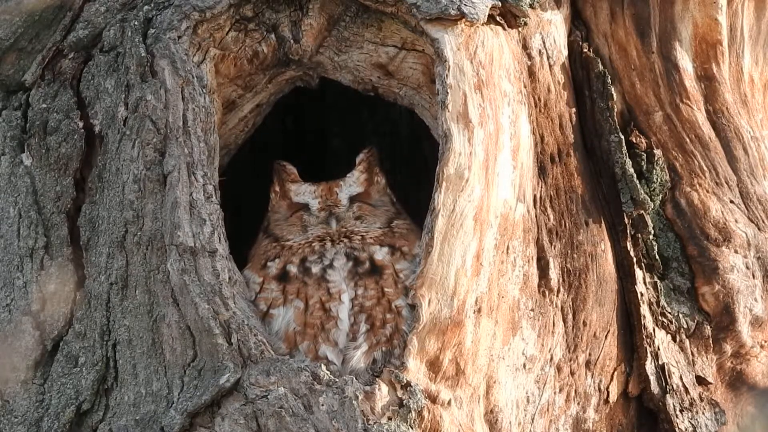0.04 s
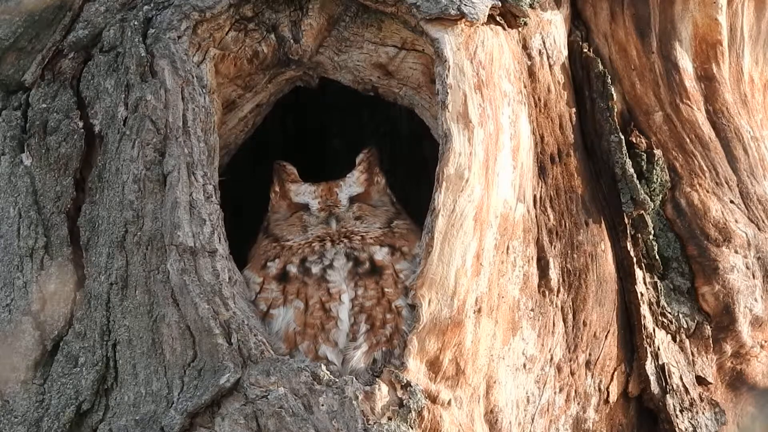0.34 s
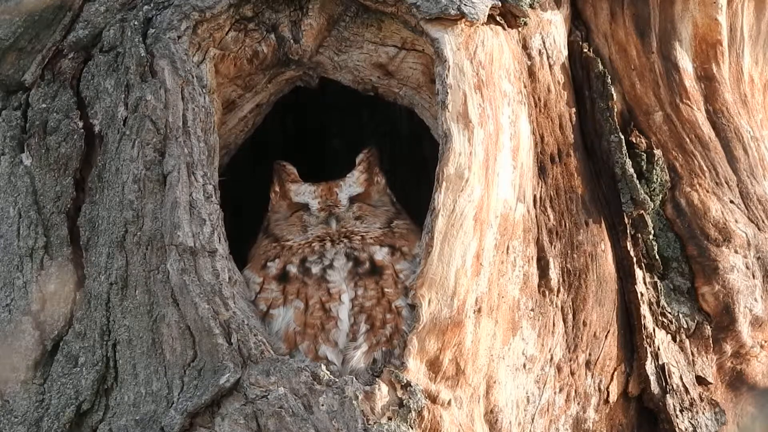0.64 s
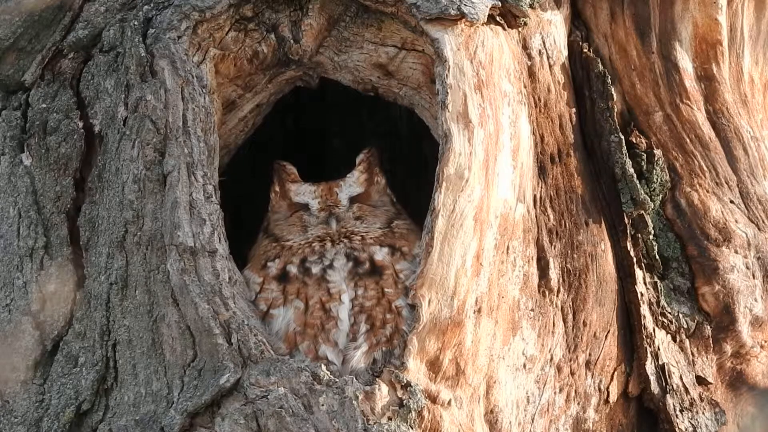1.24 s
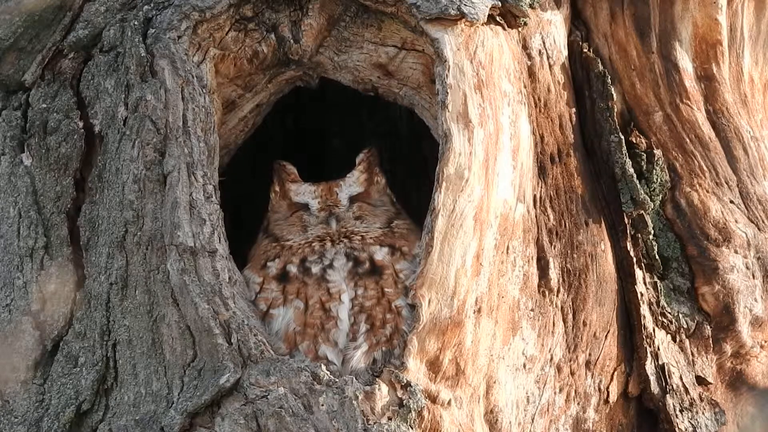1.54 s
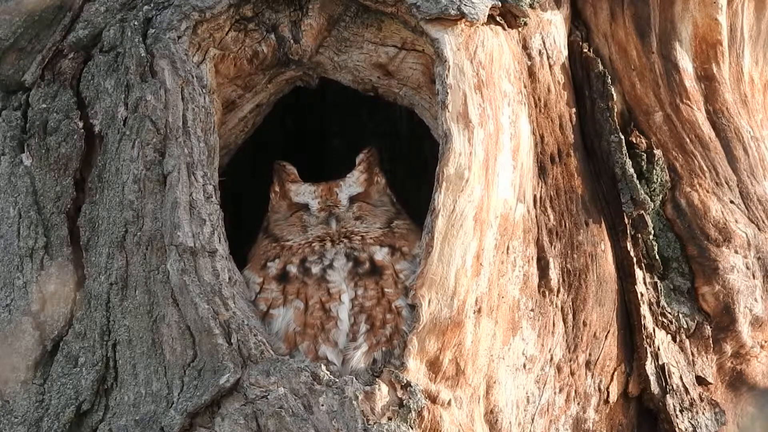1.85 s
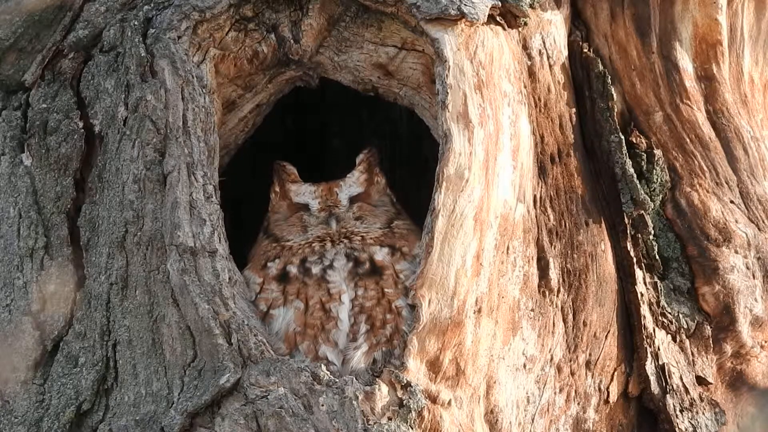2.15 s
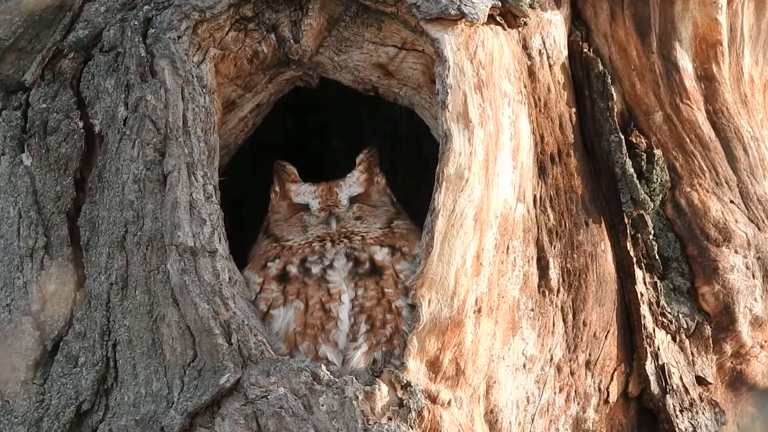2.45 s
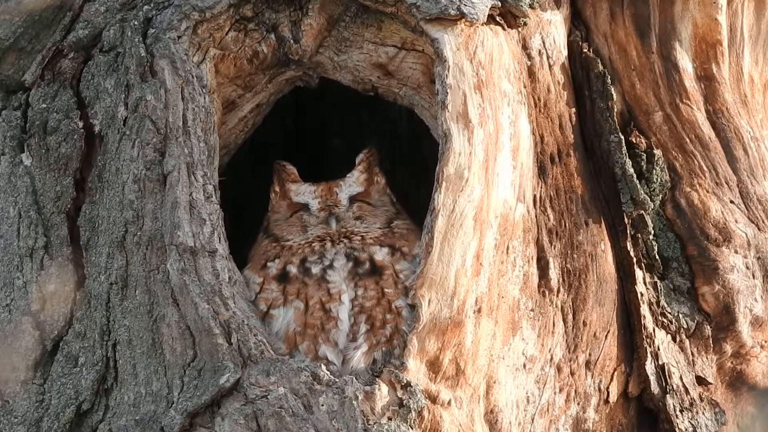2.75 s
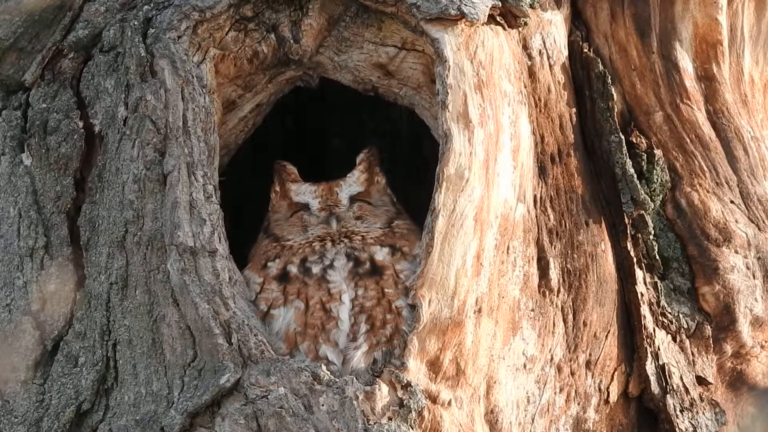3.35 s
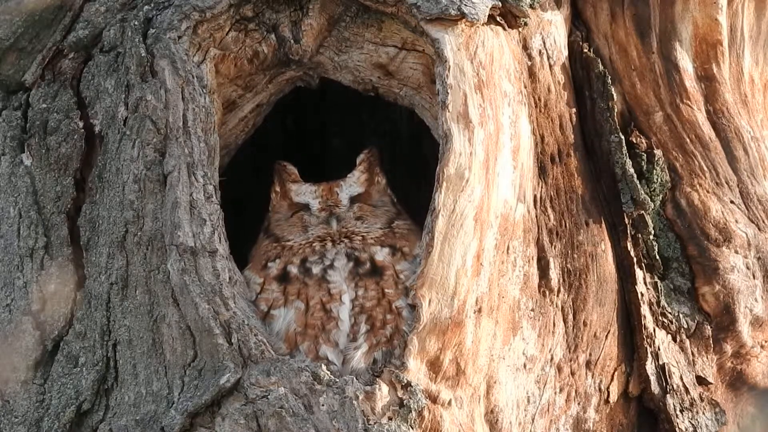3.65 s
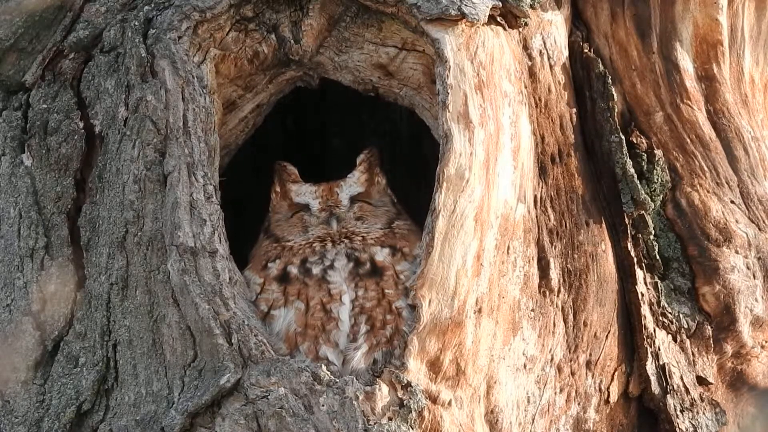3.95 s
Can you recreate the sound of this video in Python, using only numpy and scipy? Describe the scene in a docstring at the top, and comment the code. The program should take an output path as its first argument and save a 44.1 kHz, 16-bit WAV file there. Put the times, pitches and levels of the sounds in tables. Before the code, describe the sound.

Jays scold close to the microphone in a faintly echoing wood. One raspy falling cry is followed by soft hisses, nasal notes and pips from far birds, then a run of overlapping squawks, all over distant traffic and engine drone.

```python
"""A small far bird hisses in short swells and another gives nasal yanks, over distant traffic rumble,
a low engine drone and faint air. Almost at once two near jays scold, their harsh falling cries
overlapping: each starts clear, splits into subharmonics by period doubling and breaks into a rasp.
A third small bird answers the yanks with thin pips. Trunks scatter the calls and the wood reverberates
faintly; the sound reaches two microphone ports, whose gain ducks under the cries."""
import sys
import numpy as np
from scipy import signal
from scipy.fft import rfft, irfft, next_fast_len
from scipy.io import wavfile
from scipy.ndimage import uniform_filter1d, minimum_filter1d, map_coordinates

SR = 44100
rng = np.random.default_rng(int(sys.argv[2]) if len(sys.argv) > 2 else 0)


def wav_out(sig):
    """Save sig, one row per channel (or a flat mono array), as 16-bit PCM at SR to the path in sys.argv[1]."""
    wavfile.write(sys.argv[1], SR, np.round(np.clip(np.atleast_2d(sig).T, -1, 1) * 32767).astype(np.int16))


N = 176400

# Noise spectra. Each row: frequency in Hz, relative spectral density in dB.
TRAFFIC_SPECTRUM = [(28, -38), (40, -4), (85, 4), (160, -5.5), (520, -14), (780, -22.5), (1500, -28),
                    (3000, -78)]
AIR_SPECTRUM = [(700, -37), (1400, 2), (2500, 4), (4000, -6), (15000, -25.5)]
HISS_SPECTRUM = [(3000, -22), (4700, -13.5), (5600, -5), (6700, -4.5), (7800, -13), (9500, -28),
                 (15000, -50)]
RASP_SPECTRUM = [(900, -89), (1600, -8.5), (2000, -44), (2500, -5.5), (3300, -0.5), (4200, -5),
                 (5200, -2.5), (6400, 7), (7600, -6), (8700, -13), (10000, -51), (12000, -37), (15500, -56)]
# The engine's course. Each row: time in seconds, frequency in Hz, level in dB.
DRONE_COURSE = [(0, 45.7, -36), (.65, 43.84, -38.5), (1.68, 45.8, -34.5), (1.82, 47.2, -50),
                (1.98, 47.7, -26.5), (2.37, 48.5, -25.5), (2.55, 47, -41), (2.68, 48.7, -28.5),
                (2.99, 50.55, -27), (3.1, 53.26, -23), (3.53, 56, -26), (3.61, 54.7, -37), (4, 49.8, -29)]
# Hissing scolds. Each row: start in seconds, length in seconds, level in dB that the swell heads for.
HISS_SWELLS = [(-.1, 0.23, -41), (0.585, 0.18, -42), (0.801, .17, -42), (1.02, 0.17, -44.5),
               (1.215, 0.164, -44.5), (1.417, 0.15, -43.5)]
# Nasal notes. Each row: start in seconds, level in dB.
YANK_NOTES = [(.025, -36.5), (.585, -37), (.83, -34), (1.03, -33.5), (1.25, -35.5), (1.4, -43), (1.45, -35),
              (1.675, -38), (2.95, -38), (3.09, -37), (3.24, -38), (3.385, -38.5)]
# A yank's harmonics from the third upward. Each entry: relative level in dB.
YANK_PARTIALS_DB = [-12, 0, -11, -21]
# One table per jay cry. Each row: time in seconds, frequency of the strong second partial in Hz, tone
# level in dB, half-pitch and quarter-pitch subharmonics in dB relative to the tone, rasp level in dB.
CRIES = [
    [(.076, 3670, -24, -18, -39, -26), (.125, 3646, -11.5, -18, -44, -31),
     (.22, 3423, -13, -22, -34, -32.5), (.33, 3277, -15, -10, -23, -25.5),
     (.385, 3252, -10.5, -19, -16.5, -29.5), (.418, 3196, -12.5, -12, -13, -45),
     (.44, 3208, -13.5, -5.5, -38, -54), (.492, 3113, -15, -12, -30, -23.5),
     (.515, 3090, -19.5, -1, -19, -18), (.55, 2886, -55, -11, -20, -31.5)],
    [(1.672, 3620, -28, -7, -40, -36), (1.725, 3590, -13.5, -22, -43, -35),
     (1.856, 3373, -13, -18.5, -39, -31), (1.95, 3291, -13, -10, -18, -27.5),
     (2.0, 3255, -14, -0.5, -8, -29.5), (2.05, 3194, -11.5, -4, -37, -39),
     (2.2, 3165, -13.5, -4.5, -38, -47), (2.228, 3145, -20, 2, -30, -19), (2.26, 3010, -54, -15, -18, -49)],
    [(2.1, 3480, -14, -20, -31, -30), (2.135, 3420, -13, -12, -38, -24.5),
     (2.21, 3282, -11.5, -11, -24, -25.5), (2.255, 3203, -12.5, -7.5, -39, -26),
     (2.33, 3230, -13, -6, -23, -20.5), (2.4, 3218, -10, -7, -35, -16.5),
     (2.462, 3116, -36, -3, -21, -19.5)],
    [(2.392, 3617, -16, -36, -38, -42), (2.44, 3638, -8, -41, -42, -20), (2.5, 3607, -7.5, -21, -45, -22),
     (2.58, 3472, -8.5, -19, -44, -26.5), (2.7, 3316, -11.5, -6, -31, -22.5),
     (2.76, 3166, -19.5, 1, -36, -20), (2.82, 3200, -19, -12, -26, -15.5), (2.85, 3120, -39, -9, -22, -41)],
    [(2.686, 3546, -20, -13, -34, -31), (2.745, 3550, -9, -8, -34, -21),
     (2.77, 3402, -9.5, -1.5, -25, -12.5), (2.805, 3380, -13, -1, -24, -17.5),
     (2.824, 3244, -16, 0, -25, -19), (2.85, 3355, -11, -2, -32, -21.5),
     (2.875, 3267, -15.5, -1, -27, -15.5), (2.893, 3148, -13.5, -18, -15, -16),
     (2.94, 3164, -15.5, -9, -17, -15), (2.99, 2924, -45, -15, 0, -28)],
    [(3.551, 3460, -27, -14, -26, -14.5), (3.595, 3542, -12, -15, -17, -28.5),
     (3.696, 3322, -13, -5.5, -18, -31), (3.765, 3186, -13, -6, -14.5, -39),
     (3.805, 3206, -11, -5, -30, -21.5), (3.88, 3125, -16, -9, -25, -23),
     (3.94, 3040, -19, -14, -15, -21.5), (3.975, 2920, -35, 1, -22, -27)],
    [(3.798, 3383, -23, -18, -24, -35), (3.835, 3378, -17.5, -10, -14, -20.5),
     (3.94, 3274, -13.5, -8, -21, -21), (3.97, 3212, -17.5, -1.5, -30, -39), (4.05, 3155, -7, -8, -30, -42)],
]
# Each entry: which jay, 0 or 1, gives that cry.
CALLERS = [0, 0, 1, 0, 1, 0, 1]
# Resonances of a jay's vocal tract. Each row: frequency in Hz, gain in dB.
VOCAL_TRACT = [(1200, -24), (1650, -23), (2400, -11), (3300, -1), (4000, -7), (4350, -17.5), (5000, -7.5),
               (5700, -10), (6600, -4), (7400, -9.5), (8400, -16), (10400, -34), (15000, -57.5)]
# Each entry: one jay's delay at the left port relative to the right, in seconds.
JAY_LAGS_S = [6.5e-6, -0.0000082]
# Each entry: start of a pip in seconds.
PIP_STARTS = [0.914, 1.115, 1.305, 1.48]
# Reverberation of the wood. Each row: frequency in Hz, time to decay by 60 dB in seconds.
WOOD_T60 = [(1000, 0.13), (3300, 1.68), (6500, 1.65), (11000, 0.073)]
# Colouring of the two ports. Each row: frequency in Hz, left minus right level in dB.
PORT_BALANCE = [(200, -1.3), (3300, -1.4), (5000, -3.5), (6400, 1.3), (8000, 0)]


def amp(db):
    """Decibels to amplitude ratio."""
    return 10 ** (np.asarray(db) / 20)


def unit(x):
    """Normalise to rms 1."""
    return x / np.sqrt(np.mean(x ** 2) + 1e-20)


def along(points, hz):
    """Interpolate (Hz, value) points on a logarithmic frequency axis."""
    f, v = np.transpose(points)
    return np.interp(np.log(hz + 1), np.log(f + 1), v)


def curves(rows, t):
    """Interpolate each column after the first at times t."""
    times, *columns = np.transpose(rows)
    return [np.interp(t, times, column) for column in columns]


def span(start, end):
    """Sample indices and times between two moments."""
    i = np.arange(max(0, int(start * SR)), min(N, int(end * SR)))
    return i, i / SR


def ramp(t, length):
    """A raised-cosine step from 0 to 1."""
    return np.sin(np.pi / 2 * np.clip(t / length, 0, 1)) ** 2


def bell(x, centre, width):
    """A Gaussian of height 1."""
    return np.exp(-((x - centre) / width) ** 2 / 2)


def wobble(t, rate):
    """Smooth random modulation with rate knots a second."""
    return map_coordinates(rng.standard_normal(2048), [t * rate], mode="wrap")


def phase_of(hz):
    """Phase in radians is the integral of frequency."""
    return 2 * np.pi * np.cumsum(hz) / SR


def filtered(x, response):
    """Linear filtering multiplies the spectrum by a frequency response."""
    size = next_fast_len(N + SR // 4)
    return irfft(rfft(x, size) * response(np.fft.rfftfreq(size, 1 / SR)), size)[..., :N]


def noise(spectrum):
    """White noise filtered to a spectrum, at rms 1."""
    return unit(filtered(rng.standard_normal(N), lambda hz: amp(along(spectrum, hz))))


def traffic_and_air(t):
    """Broadband noise, a drifting rumble under faint air; a weak side signal decorrelates the channels."""
    rumble_gain = amp(-30.5 + .8 * wobble(t, 5.52))
    mid, side = [rumble_gain * noise(TRAFFIC_SPECTRUM) + amp(-50) * noise(AIR_SPECTRUM) for _ in range(2)]
    return mid + amp(-18) * np.array([side, -side])


def engine_drone(t):
    """One low sinusoid, slowly modulated in frequency and amplitude."""
    hz, rms_db = curves(DRONE_COURSE, t)
    return np.sqrt(2) * amp(rms_db) * np.sin(phase_of(hz))


def hisses(swell_db=6, edge_s=.014):
    """Amplitude-modulated noise: each high scold grows exponentially and stops short."""
    out, hiss = np.zeros(N), noise(HISS_SPECTRUM)
    for start, length, db in HISS_SWELLS:
        i, t = span(start, start + length)
        remaining = start + length - t
        swell = amp(db - swell_db * remaining / length)
        out[i] += hiss[i] * swell * ramp(t - start, edge_s) * ramp(remaining, edge_s)
    return out


def yanks(pitch_hz=550.7, length_s=.075, echo_s=.042):
    """A harmonic series with a missing fundamental and strong fourth partial; a trunk returns an echo."""
    out = np.zeros(N)
    for start, db in YANK_NOTES:
        i, t = span(start, start + length_s)
        progress = np.clip((t - start) / length_s, 0, 1)
        detune = .0156 * rng.standard_normal()
        arch = -.244 * (progress - .266) ** 2
        tremble = .019 * wobble(t, 400)
        phase = phase_of(pitch_hz * (1 + detune + arch + tremble))
        tone = sum(amp(partial_db + 2 * wobble(t, 40)) * np.sin(k * phase)
                   for k, partial_db in enumerate(YANK_PARTIALS_DB, 3))
        out[i] += amp(db) * np.sin(np.pi * progress) * tone
    return out + amp(-14) * np.pad(out, (int(echo_s * SR), 0))[:N]


def jay_tone(t, age, pitch_hz, half_db, quarter_db, roughness, bright_hz=6100):
    """Period doubling adds partials at half and quarter steps of the pitch. Returns tone and phase."""
    jitter = .0024 * wobble(t, 90) + roughness * (.008 * wobble(t, 900) + .012 * wobble(t, 70))
    # the subharmonics come and go
    half_db, quarter_db = [np.minimum(db + 3.5 * wobble(t, 28), 0) for db in (half_db, quarter_db)]
    tone = np.zeros(len(t))
    for k in np.arange(3, 37) / 4:
        share_db = 0 if k % 1 == 0 else half_db if k % .5 == 0 else quarter_db
        since = np.maximum(age - .0105 * (k > 2), 0)  # the upper partials enter later
        scooped_hz = pitch_hz * (1 - .36 * np.exp(-since / .009))  # starts flat and slides up
        partial_hz = k * scooped_hz
        phase = phase_of(scooped_hz * (1 + jitter))
        # phase noise blurs weak subharmonics and, in the rasp, the upper partials
        slip = .8 * (1 - amp(share_db)) * wobble(t, 170)
        slip += .8 * roughness * max(k - 2, 0) * wobble(t, 600)
        if k > 2:
            flick_db = 11 * np.exp(-since / .008) * bell(partial_hz, bright_hz, 1300)
            onset = ramp(since, .002) * amp(flick_db)
        else:
            onset = ramp(since, .0032)
        share_db = np.minimum(share_db + 5 * bell(partial_hz, bright_hz, 600), 0)
        break_db = -20 * bell(t, .362, .014) * (k == 2)  # a voice break in the first cry
        shimmer_db = 2.6 * wobble(t, 22.02)
        gain = onset * amp(along(VOCAL_TRACT, partial_hz) + share_db + break_db + shimmer_db)
        tone += gain * np.sin(k * phase + slip + rng.uniform(0, 2 * np.pi))
    return tone, phase


def jay_rasp(i, phase, roughness, screech_hz=4150):
    """Grainy noise modulated at half the pitch; a resonance opens as the voice breaks up."""
    screech = unit(filtered(rng.standard_normal(N), lambda hz: bell(hz, screech_hz, 650)))
    rasp = noise(RASP_SPECTRUM)[i] + amp(1.5) * roughness * screech[i]
    pulsing = 1 + .51 * np.cos(phase / 2)
    grain = amp(-1.5 * wobble(i / SR, 500))
    return unit(rasp * pulsing * grain)


def jay(who, gain_db=3.5, rasp_attack_s=.035, release_s=.007):
    """Each cry superposes a falling tone and a rasp; the tone grows unsteady with the rasp's share."""
    out = np.zeros(N)
    for cry in [cry for cry, caller in zip(CRIES, CALLERS) if caller == who]:
        start, end = cry[0][0], cry[-1][0]
        i, t = span(start, end)
        age = t - start
        second_partial_hz, tone_db, half_db, quarter_db, rasp_db = curves(cry, t)
        roughness = 1 / (1 + amp(tone_db - rasp_db))
        tone, phase = jay_tone(t, age, second_partial_hz / 2, half_db, quarter_db, roughness)
        rasp = jay_rasp(i, phase, roughness) * ramp(age, rasp_attack_s)
        flutter_db = 2.5 * roughness * wobble(t, 300)
        voice = amp(tone_db + flutter_db) * tone + amp(rasp_db) * rasp
        out[i] += amp(gain_db) * voice * ramp(end - t, release_s)
    return out


def pips(start_hz=2750, rise=.035, length_s=.065, level_db=-45):
    """Pure tones glide upward under a half-sine envelope: a bird still farther off."""
    out = np.zeros(N)
    for start in PIP_STARTS:
        i, t = span(start, start + length_s)
        progress = np.clip((t - start) / length_s, 0, 1)
        tone = np.sin(phase_of(start_hz * (1 + rise * progress)))
        out[i] += amp(level_db) * np.sin(np.pi * progress) * tone
    return out


def wood(calls, scatter_s=.009, scatter_db=-17, tail_db=-27.5):
    """Convolution with the wood's impulse response: early scatter off near trunks, then a long tail."""
    hz, t, spectra = signal.stft(rng.standard_normal((2, SR)), SR, nperseg=256)
    decay = amp(-60 * t / along(WOOD_T60, hz)[:, None])
    tail = signal.istft(spectra * decay, SR, nperseg=256)[1]
    scatter = rng.standard_normal(tail.shape) * np.exp(-np.arange(tail.shape[1]) / SR / scatter_s)
    response = amp(tail_db) * tail / np.linalg.norm(tail[0])
    response += amp(scatter_db) * scatter / np.linalg.norm(scatter[0])
    return signal.fftconvolve(calls[None], response, axes=1)[:, :N]


def scene():
    """Arrival-time differences set one jay to each side; the far birds have more reverberant sound."""
    t = np.arange(N) / SR
    jays = [jay(who) for who in range(2)]
    sides = np.array([[-1], [1]])
    direct = sum(filtered(voice, lambda hz: np.exp(1j * np.pi * hz * lag * sides))
                 for voice, lag in zip(jays, JAY_LAGS_S))
    far_notes, hiss = yanks() + pips(), hisses()
    background = traffic_and_air(t) + engine_drone(t)
    reverberation = wood(sum(jays) + amp(15) * far_notes + amp(11) * hiss)
    return direct + far_notes + hiss + background + reverberation


def record(dry, knee_db=-10, reaction_s=.12, ceiling=.95, hold_s=.006, top_hz=15700):
    """Compression: after the ports' colouring, automatic gain and a limiter duck; a low-pass follows."""
    pair = filtered(dry, lambda hz: amp(along(PORT_BALANCE, hz) * np.array([[.5], [-.5]])))
    step = 1 / (reaction_s * SR)
    running_power = signal.lfilter([step], [1, step - 1], np.mean(pair ** 2, axis=0))
    pair = pair / np.sqrt(1 + running_power / amp(knee_db) ** 2)
    hold = int(hold_s * SR)
    limiter_gain = np.minimum(1, ceiling / (np.abs(pair).max(axis=0) + 1e-9))
    limiter_gain = uniform_filter1d(minimum_filter1d(limiter_gain, 2 * hold), hold)
    return filtered(pair * limiter_gain, lambda hz: hz < top_hz)


dry = scene()
out = record(dry)
wav_out(out)
```